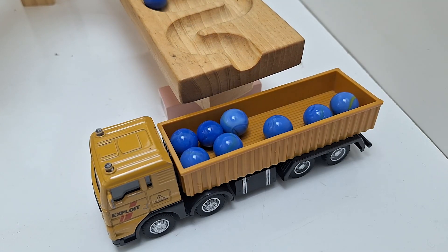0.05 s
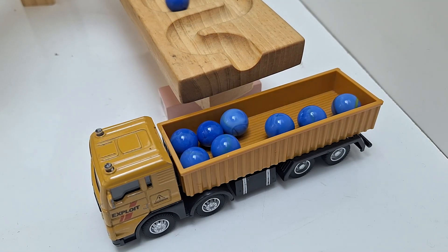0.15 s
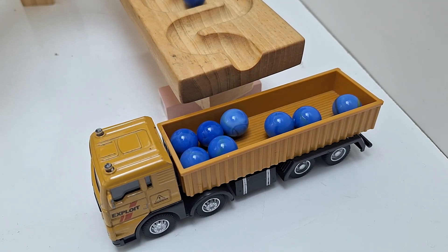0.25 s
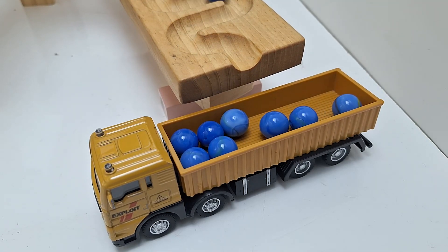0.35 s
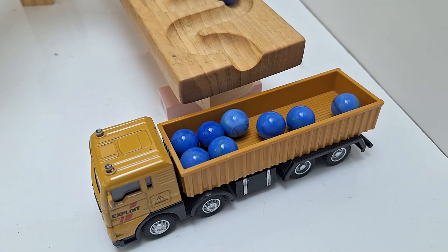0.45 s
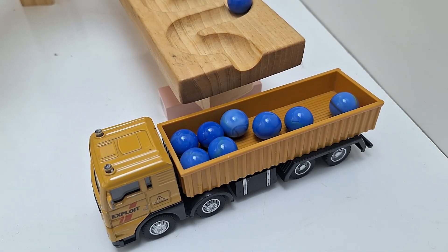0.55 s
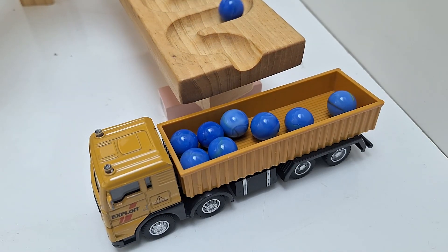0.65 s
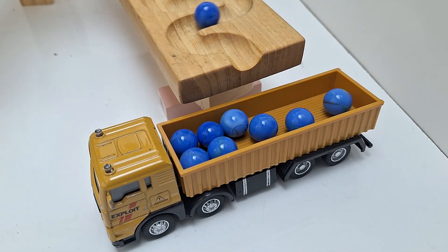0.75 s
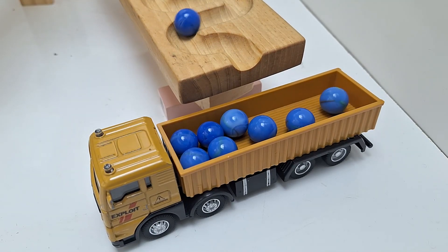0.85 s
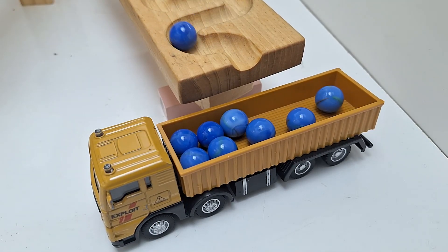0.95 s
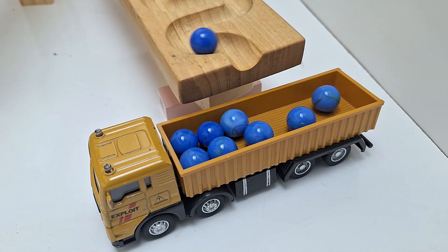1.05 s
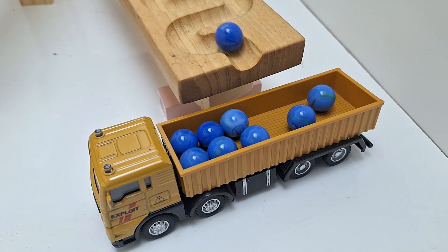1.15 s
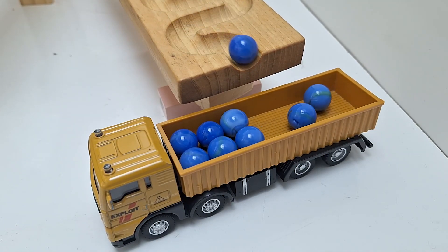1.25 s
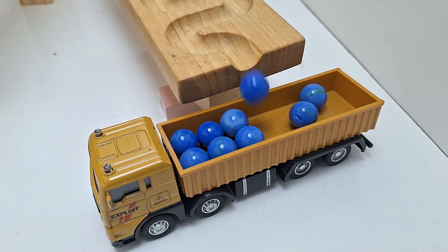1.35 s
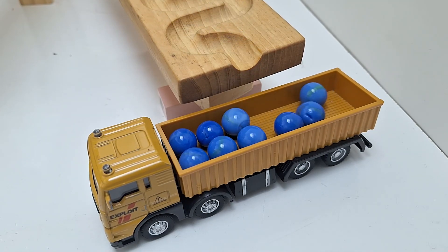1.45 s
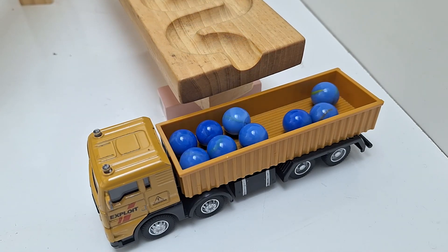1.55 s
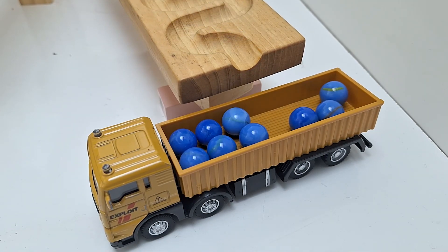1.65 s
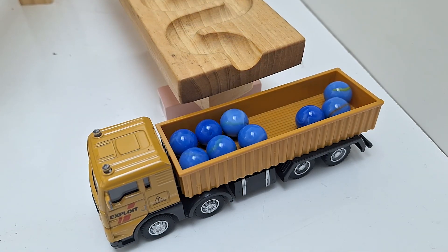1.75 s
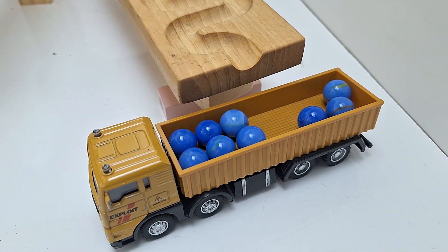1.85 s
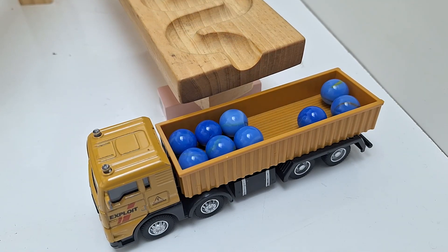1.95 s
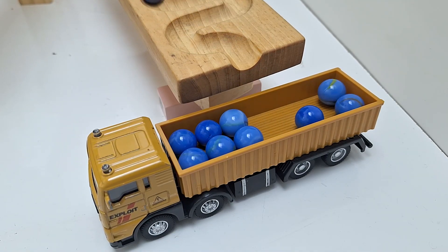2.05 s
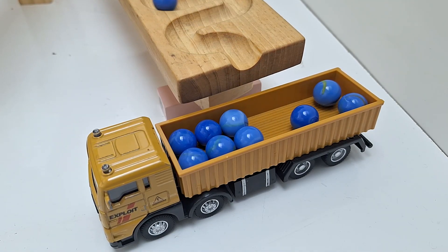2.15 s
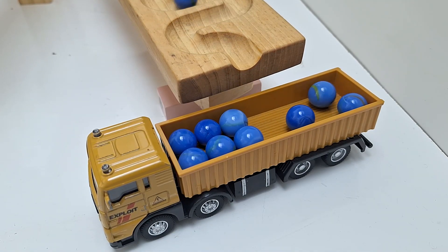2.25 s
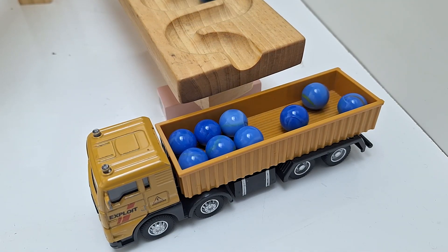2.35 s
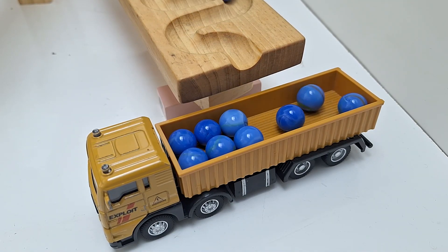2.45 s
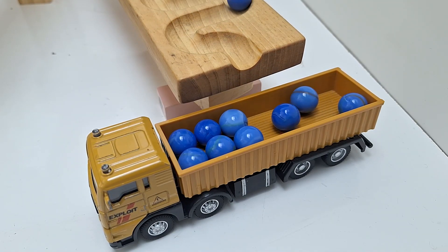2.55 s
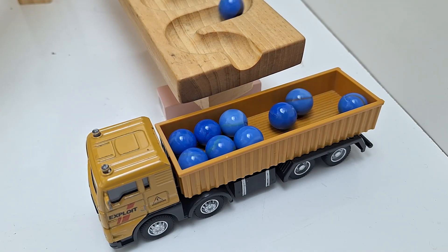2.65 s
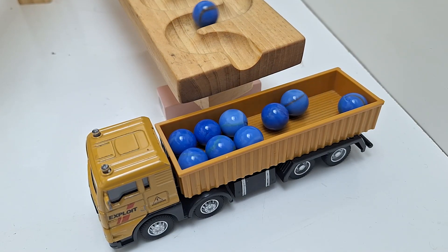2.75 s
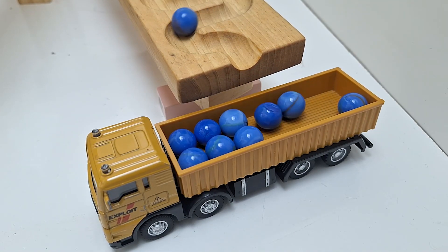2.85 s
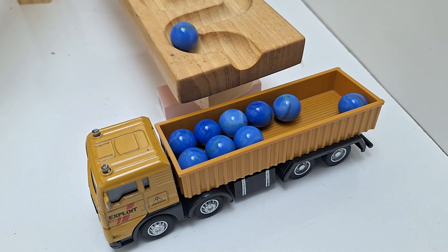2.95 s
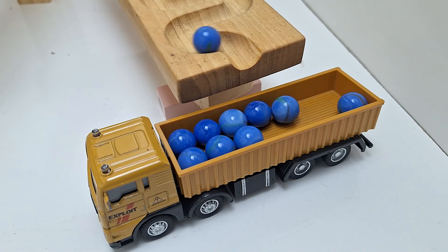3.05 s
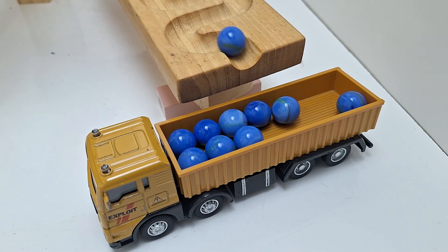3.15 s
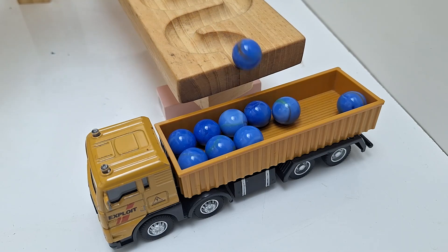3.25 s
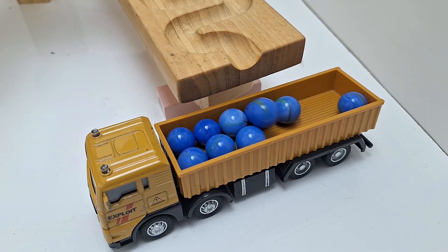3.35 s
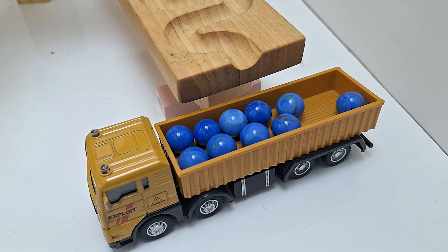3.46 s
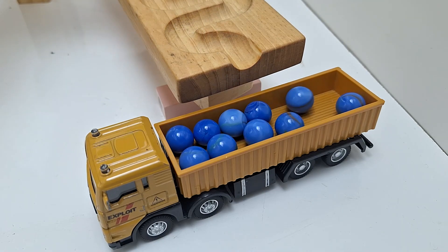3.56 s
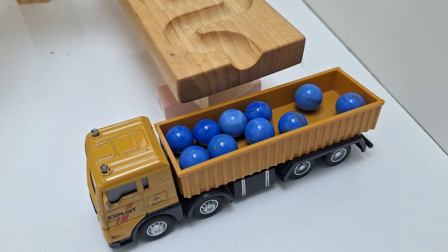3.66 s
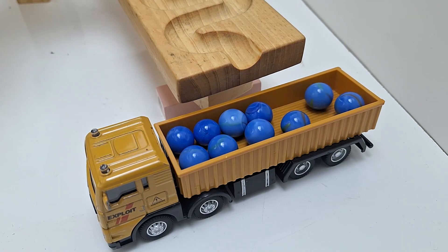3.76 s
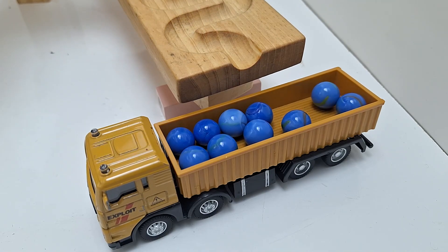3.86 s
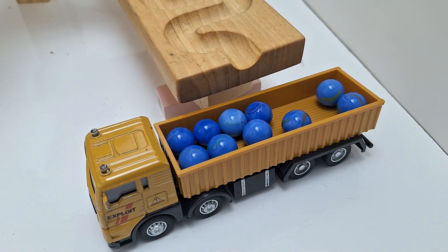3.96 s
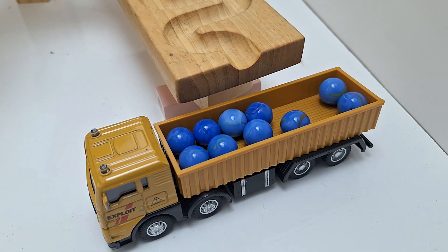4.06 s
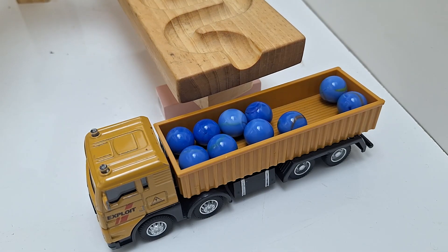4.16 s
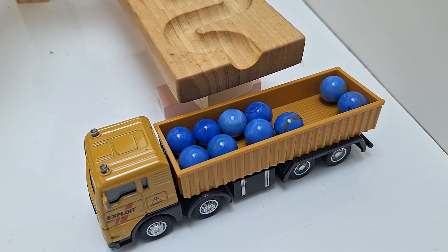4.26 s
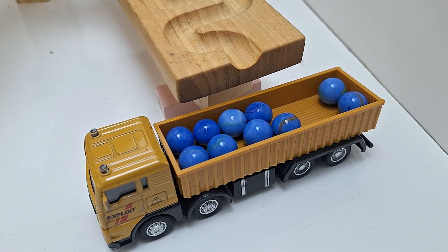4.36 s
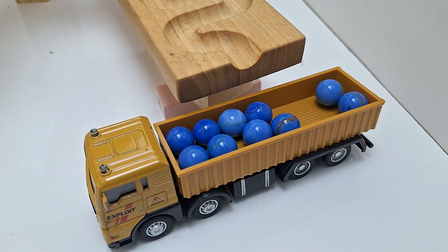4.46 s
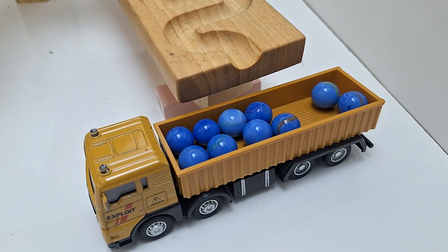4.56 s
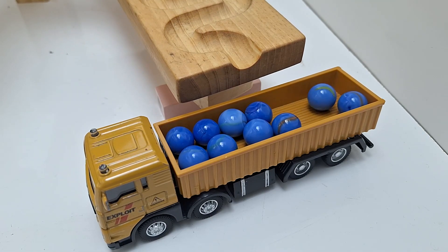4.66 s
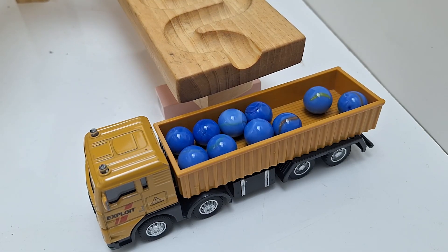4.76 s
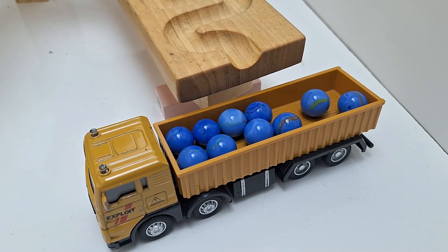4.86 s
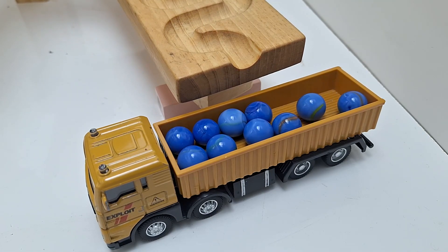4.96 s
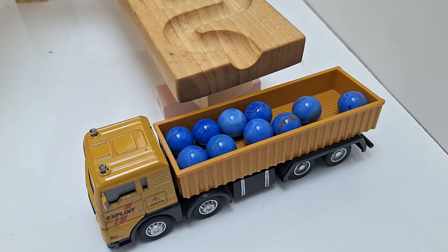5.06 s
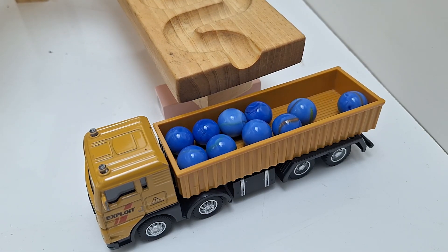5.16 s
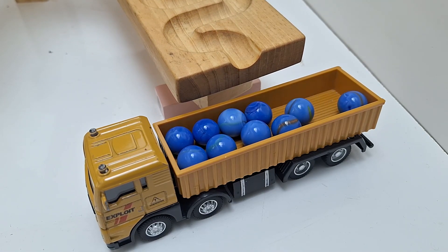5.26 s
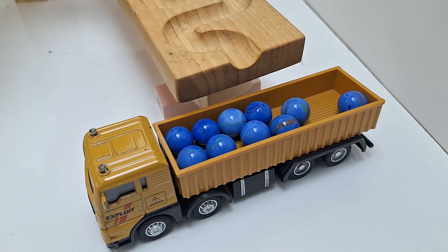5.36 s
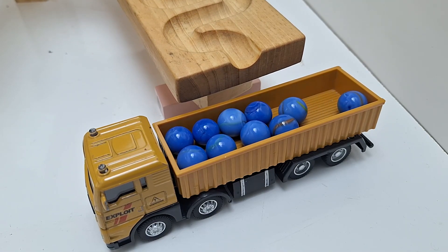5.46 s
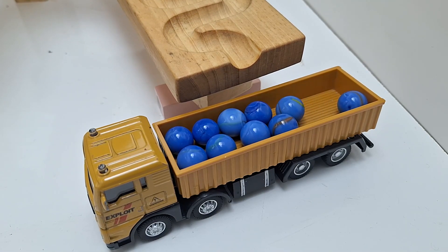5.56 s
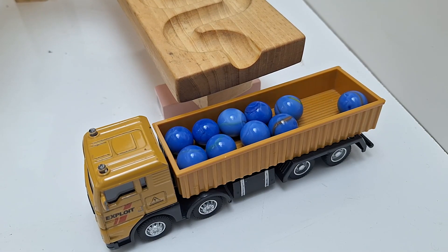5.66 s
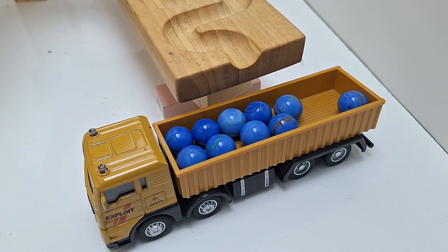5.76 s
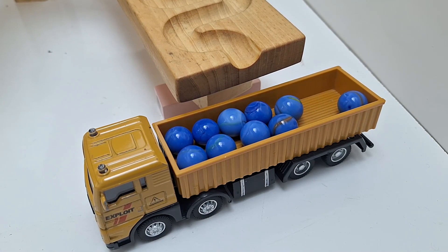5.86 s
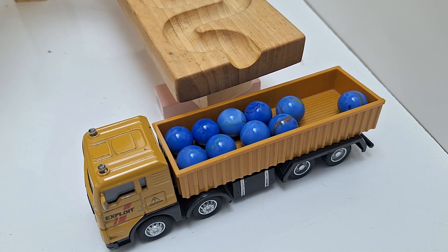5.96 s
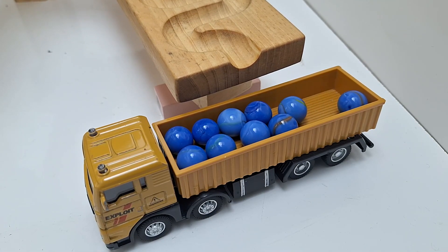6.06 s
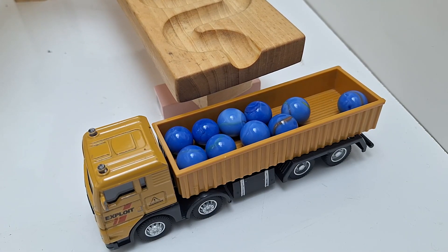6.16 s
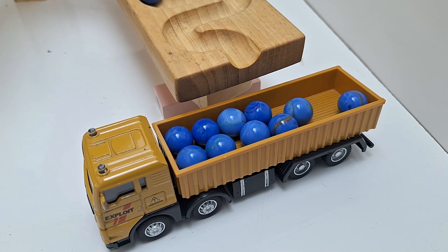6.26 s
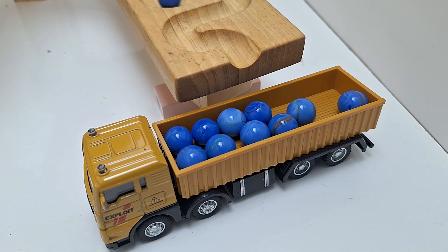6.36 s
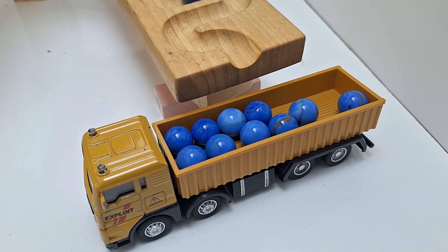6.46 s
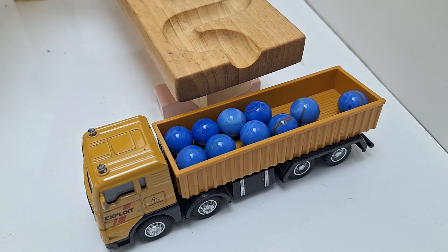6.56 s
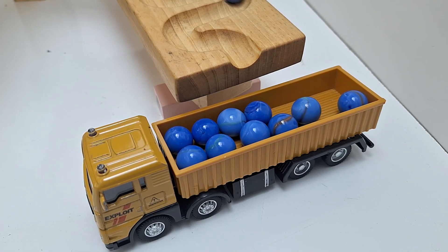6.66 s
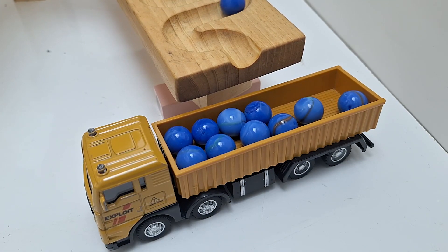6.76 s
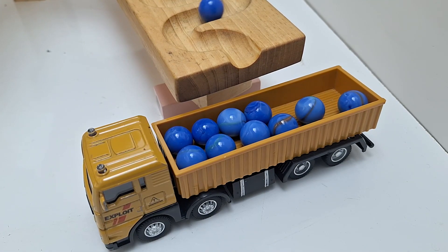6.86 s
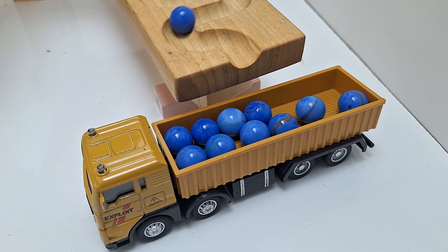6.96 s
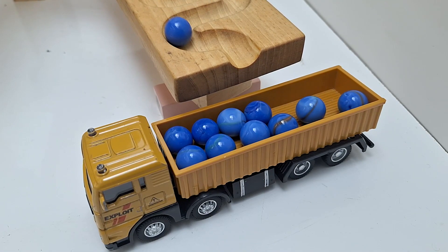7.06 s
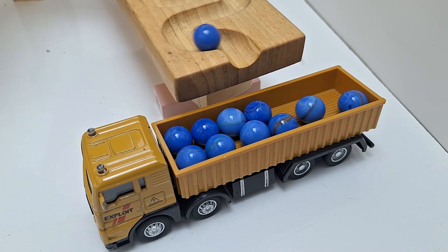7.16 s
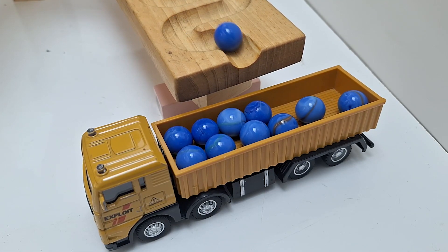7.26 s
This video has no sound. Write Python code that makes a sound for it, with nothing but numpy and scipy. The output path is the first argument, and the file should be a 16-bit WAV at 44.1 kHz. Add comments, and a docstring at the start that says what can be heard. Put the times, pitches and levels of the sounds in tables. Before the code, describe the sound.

A close stereo pickup in a small hard room, with low noise and a faint hum. From 0 to 1.4 s a marble rumbles unevenly down a wooden groove with soft hollow knocks, firmer near 1.3 s with a bright glass tick. At 1.43 s it drops into a thin plastic truck bed: a loud, fast flurry of clacks until 1.6 s, then lighter taps and drumming over ribs until about 2.4 s. Rolling on wood returns at 2.5 s, with knocks near 3.2 s, and a second plastic clatter at 3.4 to 3.55 s. At 3.94 s a hard wooden knock and several bounces lead into brief rolling, with glassy ticks around. It is nearly quiet from 4.5 to 5.2 s. Faint rolling grows, then loud wooden knocks cluster at 5.8 to 5.9 s. Steady rumbling and sparse knocks continue to the end at about 7.3 s.

```python
"""Marbles knock and rumble down a wooden run, then clatter into the plastic bed of a toy truck.
There they drum over its ribs and click together, in a small hard room with a faint low hum.
The wooden block rings as a few clear sine modes plus filtered noise for its many duller modes.
Plastic and glass ring as short bursts of filtered noise; rolling is a run of tiny random impacts."""
import sys
import numpy as np
from scipy import signal
from scipy.fft import rfft, irfft, next_fast_len
from scipy.io import wavfile

SR = 44100
rng = np.random.default_rng(int(sys.argv[2]) if len(sys.argv) > 2 else 0)


def bounce(signal):
    """Save signal as a 16-bit WAV file at the path given by the first command-line argument."""
    frames = np.transpose(np.atleast_2d(signal))
    limited = np.clip(frames, -1, 1)
    pcm = np.round(limited * 32767).astype(np.int16)
    wavfile.write(sys.argv[1], SR, pcm)


N = 322371  # length in samples

# All levels in these tables are relative: the functions below add their own mix settings.
# Room tone. Each row: frequency in Hz, level in dB per Hz.
ROOM_AIR = [(15, -16.5), (33, -4), (55, -1.5), (85, -0.5), (115, -5.5), (185, -5.5), (310, -24),
            (490, -20.5), (800, -47.5), (2000, -44), (3000, -42.5), (6000, -34), (8000, -44),
            (15000, -50.5)]
# Steady hum. Each row: frequency in Hz, level in dB.
HUM_TONES = [(37.7, -56.5), (75.4, -60)]
# How fast the room's tail dies. Each row: frequency in Hz, time to fall by 60 dB in seconds.
ROOM_DECAY = [(100, 0.69), (500, 0.37), (1500, 0.33), (3000, 0.33), (6000, 0.3), (10000, 0.29),
              (15000, 0.31)]
# How alike the noise is at the two microphones, for sound straight from its source and for the room.
# Each row: frequency in Hz, likeness from 0 to 1.
DIRECT_LIKENESS = [(100, 0), (400, 1), (1000, 0), (3000, 0), (15000, 0)]
ROOM_LIKENESS = [(100, 1), (300, 0.91), (600, 1), (1300, 0.16), (15000, 0.027)]
# Spells of high hiss. Each row: start in seconds, end in seconds, level at the start in dB.
HISS_SPELLS = [(0.31, 0.88, -73), (0.854, 1.45, -70), (3.03, 3.4, -68)]
HISS_RISE_S, HISS_SAG_DB_PER_S, HISS_RELEASE_S = 0.04, 11, 0.06

# Marble on marble. Each row: start in seconds, level of the click in dB, body in dB against the click.
MARBLE_CLICKS = [(0.28, -47, -28), (0.3053, -51.5, 7.5), (1.203, -47.5, 9), (1.299, -35, -10),
                 (2.6493, -45, -20), (2.716, -41, -19.5), (3.071, -44, -27), (3.8826, -49, -26.5),
                 (3.923, -40, -5.5), (4.36, -56, -12), (4.458, -64.5, -14), (4.74, -64.5, -6),
                 (5.1708, -44, -23.5), (5.45, -56, -14.5), (6.3115, -66, 6)]
# Dense modes of the marbles. Each row: frequency in Hz, level in dB per Hz.
GLASS_COLOUR = [(100, -36.5), (1000, -17), (2500, -19), (4000, -6), (5500, -0.5), (6300, 6), (7500, -10),
                (10000, -13.5), (15000, -27)]
# How fast they die. Each row: frequency in Hz, time to fall by 60 dB in seconds.
GLASS_DECAY = [(1000, 0.039), (6000, 0.037), (15000, 0.0095)]

# Marble on plastic. Each row: start in seconds, level of the clack in dB, snap in dB against the clack.
BED_CLACKS = [(1.4333, -12.5, -8), (1.44, -17.5, -9.5), (1.4705, -13.5, -8), (1.5051, -18, -11.5),
              (1.5301, -16, -7.5), (1.6046, -30, -39), (1.766, -30, -12.5), (1.8307, -33.5, -4),
              (1.9027, -31, -8.5), (2.0613, -24.5, 1), (2.1145, -28, -5), (2.2187, -33, -8),
              (2.2697, -29, -6.5), (3.035, -32.5, -10.5), (3.043, -30.5, -20.5), (3.4036, -11, -12.5),
              (3.4174, -15.5, -7), (3.4434, -19.5, -12.5), (3.467, -17.5, -11.5), (3.495, -16, -5),
              (3.5355, -16.5, -16), (3.5632, -35.5, 2.5)]
# Sound colours of the truck bed: struck, drummed on, its walls ringing, and the marbles' chatter.
# Each row: frequency in Hz, level in dB per Hz.
BED_COLOUR = [(40, -14.5), (150, -14.5), (300, -2.5), (450, -13), (560, -4.5), (780, -14.5), (1200, 2.5),
              (1500, 1.5), (2000, -2.5), (3100, 2), (4200, -4), (6200, 0.5), (7500, -4.5), (15000, -16)]
BED_DRUM_COLOUR = [(30, -5.5), (70, -1), (130, -8), (210, -1.5), (330, 3.5), (490, 6.5), (780, -2),
                   (1050, 3.5), (1250, 6.5), (1480, -10), (2600, -21), (6000, -44.5)]
BED_WALL_COLOUR = [(200, -22.5), (1200, -22), (1550, -15), (1750, 7), (1900, -4.5), (2100, 1), (2500, -30),
                   (5000, -51)]
BED_CHATTER_COLOUR = [(200, -34.5), (1500, 4), (2600, -7), (4500, 0.5), (6200, 5), (7500, -1.5), (9000, -6),
                      (11000, -19), (15000, -24.5)]
# How fast the plastic's ring dies. Each row: frequency in Hz, time to fall by 60 dB in seconds.
PLASTIC_DECAY = [(200, 0.048), (1200, .08), (3000, .055), (7000, 0.028), (15000, .035)]
# Shoves that set marbles rolling over the bed. Each row: start in seconds, level of the drumming in dB,
# ring of the walls in dB against the drumming, time to slow to rest in seconds.
BED_SHOVES = [(1.798, -28, -10.5, 0.18), (1.884, -29, -5.5, 0.18), (2.038, -29.5, -2, 0.37),
              (2.248, -31.5, -13.5, 0.19), (2.388, -40.5, -22.5, 0.16)]
SHOVE_RISE_S = 0.034

# Rolling down the groove, one list for each run; the rumble's level stands for the marble's speed.
# Each row: time in seconds, level in dB.
GROOVE_RUNS = [
    [(0.0, -44), (0.23, -54.5), (0.604, -46), (0.864, -54.5), (0.878, -45.5), (1.398, -38.5), (1.41, -40)],
    [(2.5, -49), (2.642, -49.5), (2.652, -41), (2.79, -51.5), (3.218, -43.5), (3.31, -45), (3.39, -62)],
    [(3.98, -41), (4.048, -39), (4.056, -32), (4.224, -47.5), (4.282, -60), (4.312, -56.5), (4.5, -74.5)],
    [(4.9, -79), (4.94, -79), (4.972, -68), (5.244, -61), (5.336, -49), (5.476, -48.5), (5.78, -55)],
    [(5.98, -44.5), (6.06, -48), (6.692, -48), (6.7, -43.5), (6.972, -48), (7.03, -41), (7.3, -47)],
]
# The marble swings out to the far left end of the block and back.
# Each row: turning time in seconds, time from the turn until the swing has shrunk to 37 % in seconds.
FAR_SWINGS = [(0.92, 0.32), (2.802, 0.32), (4.398, 0.54), (5.149, 0.13), (6.33, 0.071), (6.799, 0.11)]
# Sound colour of the groove's rumble. Each row: frequency in Hz, level in dB per Hz.
GROOVE_COLOUR = [(25, -25), (80, -6), (105, -14.5), (165, 7), (215, -11.5), (310, 5), (400, -4), (490, 7),
                 (570, -0.5), (750, -2), (900, -9), (1500, -17.5), (2400, -28.5), (3000, -37)]
# The block's ring while a marble rolls in the middle, and its change at the far end, in dB
RING_DB, FAR_RING_DB = -2.5, -17.5

# Knocks of marble on wood. Each row: start in seconds, level of the ring in dB,
# crack in dB against the ring, left over right in dB.
WOOD_KNOCKS = [(0.0024, -32.5, -34, 0), (0.2364, -39, -35, -2.5), (0.3419, -38, -41, 0),
               (0.4562, -36.5, -36, 1), (0.5452, -35.5, -11.5, -1), (0.6985, -37, -23.5, 1),
               (0.8752, -35.5, -13.5, 1), (1.0481, -36.5, -43, 2.5), (1.143, -39.5, -16, -1),
               (1.2356, -38, -35, -14), (1.2703, -29, -30, -2), (1.3009, -24, -18.5, -1),
               (1.739, -38.5, -41, 1), (2.56, -41, -21, -1.5), (2.646, -37.5, -25, 1),
               (3.1277, -36, -34, 1.5), (3.2041, -32, -27.5, 0), (3.26, -37.5, -23, -6),
               (3.9401, -10.5, -25, -2), (4.0284, -21, -29.5, -1), (4.0584, -18.5, -15, 0.5),
               (4.114, -20.5, -7.5, 0.5), (4.1276, -28, -10, 11), (5.0961, -57.5, -47, 6),
               (5.3166, -45.5, -23.5, 12), (5.466, -28, -42.5, -1.5), (5.61, -28.5, -30, -0.5),
               (5.7962, -12.5, -25, -2), (5.8151, -13, -7, -1), (5.888, -21, -17, 2),
               (5.914, -12.5, -16, -1), (6.0267, -31.5, -19.5, 0.5), (6.0622, -35, -31.5, 4.5),
               (6.467, -32, -32.5, -1.5), (6.703, -27.5, -7.5, 4.5), (7.022, -36, -17, 2),
               (7.2379, -26.5, -29, 1)]
# Clear modes of the wooden block. Each row: frequency in Hz, level struck in the middle in dB,
# level struck at the far left end in dB, time to fall by 60 dB in seconds.
BLOCK_MODES = [(168, -22, -22, 0.16), (492.6, -20.5, -18.5, 0.41), (828, -27, -25.5, 0.31),
               (1063, -20, -0.5, 0.067), (1227.5, -10.5, -17, 0.1), (1277.3, 2.5, -8.5, .06),
               (1967, -14, -10.5, 0.076), (2340, -9, 8.5, 0.051), (2747, -39, -25.5, .06),
               (2970, -35.5, -10.5, 0.21), (3020, -19.5, -33, 0.019), (3540, -9, -28.5, 0.062),
               (4400, -27.5, -37.5, 0.075)]
# Dense modes of block and posts, and the block's chatter on its plastic posts.
# Each row: frequency in Hz, level in dB per Hz.
WOOD_COLOUR = [(30, -29.5), (75, 10), (150, 7.5), (350, 6.5), (550, 2), (850, -3.5), (1300, -6.5),
               (2300, -10.5), (3600, -23.5), (5000, -23.5), (7000, -33), (10000, -50.5), (15000, -47.5)]
POST_COLOUR = [(300, -28), (1500, -9), (2400, -1), (3000, -3.5), (3500, -3.5), (4200, -16), (6000, -28.5),
               (15000, -53.5)]
# How fast the dense wood modes die. Each row: frequency in Hz, time to fall by 60 dB in seconds.
WOOD_DECAY = [(100, 0.21), (500, .09), (1500, 0.033), (5000, 0.0055), (15000, 0.0078)]

# The low thud grows more slowly than the ring: its dB for a 0 dB blow, and dB per dB of the blow
WOOD_THUD_DB, WOOD_THUD_GROWTH = -25, 0.78
BED_THUD_DB, BED_THUD_GROWTH = -30, 0.4


def gain_of(db):
    """Turns decibels into amplitude."""
    return 10 ** (np.asarray(db) / 20)


def evened(x):
    """Scales a stereo sound so that the average of its two sides has rms 1."""
    return x / np.sqrt(np.mean(x.mean(0) ** 2) + 1e-20)


def read(points, hz):
    """Reads a table between its rows, on a log-frequency axis."""
    f, value = np.transpose(points)
    return np.interp(np.log(hz + 1), np.log(f), value)


def add(mix, s, sound):
    """Adds a stereo sound to the mix at time s in seconds."""
    part = mix[:, max(round(s * SR), 0):][:, :sound.shape[1]]
    part += sound[:, :part.shape[1]]


def level(rows):
    """Turns a dB curve into a gain that fades in before its start and out after its end."""
    s, db = np.transpose(rows)
    times = np.r_[s[0] - .1, s, s[-1] + .4]
    return gain_of(np.interp(np.arange(N) / SR, times, np.r_[-120, db, -120]))


def colour(x, points):
    """Filters a sound to a (Hz, dB) curve, with the least delay that curve allows (minimum phase)."""
    size = 2 * next_fast_len(x.shape[1] // 2 + 1024)
    cepstrum = irfft(np.log(gain_of(read(points, np.fft.rfftfreq(size, 1 / SR)))))
    # folding the cepstrum forward in time makes the filter causal
    cepstrum[1:size // 2] *= 2
    cepstrum[size // 2 + 1:] = 0
    return irfft(rfft(x, size) * np.exp(rfft(cepstrum)), size)[:, :x.shape[1]]


def noise_pair(count, same, t60=None):
    """Noise at two microphones, as alike as the table says; with t60, each band dies at its own speed."""
    hz, t, z = signal.stft(rng.standard_normal((2, count)), SR, nperseg=256)
    likeness = np.clip(read(same, hz), -1, 1)[:, None]
    z[1] = likeness * z[0] + np.sqrt(1 - likeness ** 2) * z[1]
    if t60 is not None:
        z = z * gain_of(-60 * t / read(t60, hz)[:, None])
    return signal.istft(z, SR)[1][:, :count]


def panned(x, db):
    """Sets left over right by db."""
    return x * gain_of([[db / 2], [-db / 2]])


def in_room(x, wet_db, gap=0.0037):
    """Adds a room tail of fading noise, drawn anew each time; it swells in around gap seconds."""
    tail = noise_pair(SR // 2, ROOM_LIKENESS, ROOM_DECAY)
    tail *= np.clip(np.arange(SR // 2) / SR / gap - .5, 0, 1)
    tail *= gain_of(wet_db) / np.linalg.norm(tail[0])
    tail[:, 0] = 1  # the direct sound
    return signal.fftconvolve(x, tail, axes=1)


def dense_ring(body, t60, lag_count=6):
    """Countless overlapping modes struck at once, as dying noise; the right side lags by a few samples."""
    left, right = colour(noise_pair(SR // 4, DIRECT_LIKENESS, t60), body)
    return evened(np.array([left, np.pad(right, (lag_count, 0))[:len(left)]]))


def block_ring(far, spread_db=0, lag=0.00015, rise=0.0013):
    """The block's modes as struck at one spot (far 0-1); they reach the left microphone first."""
    t = np.maximum(np.arange(SR // 4) / SR - np.array([[0], [lag]]), 0)
    hz, middle_db, end_db, t60 = np.transpose(BLOCK_MODES)[:, :, None, None]
    db = middle_db + far * (end_db - middle_db) + spread_db * rng.standard_normal(hz.shape)
    # modes start in pairs, two upward and two downward
    sign = (-1) ** (np.arange(len(hz)) // 2)[:, None, None]
    modes = sign * gain_of(db - 60 * t / t60) * np.sin(2 * np.pi * hz * t)
    return evened(modes.sum(0) * (1 - np.exp(-t / rise)))


def contact(ring, db, soft_hz=2300, hard_hz=14000, skid=0.11, skid_s=0.013):
    """A gentle bump has a long, dull contact and skids on for a moment; a hard blow is short and bright."""
    hard = np.clip((db + 31) / 17, 0, 1)
    t = np.arange(SR // 20) / SR
    grains = rng.standard_normal(len(t)) * (rng.random(len(t)) < .05)
    force = (1 - hard) * skid * np.exp(-t / skid_s) * grains
    force[0] = 1  # the blow itself
    corner_hz = min(soft_hz * (hard_hz / soft_hz) ** hard, SR / 3)
    dulled = signal.sosfilt(signal.butter(5, corner_hz, fs=SR, output="sos"), ring)
    return signal.fftconvolve(dulled, force[None], axes=1)


def blow(ring, bands, dbs):
    """Lifts or lowers each band of a blow so that its first 10 ms comes out at the given level."""
    head = ring.mean(0)[:SR // 100]
    power = 2 * abs(rfft(head, 4096)) ** 2 / (4096 * len(head))
    hz = np.fft.rfftfreq(4096, 1 / SR)
    have = [10 * np.log10(power[(hz > lo) & (hz < hi)].sum()) for lo, hi in bands]
    # lift or lower each band at its middle by what it lacks
    return colour(ring, [(np.sqrt(lo * hi), db - h) for (lo, hi), db, h in zip(bands, dbs, have)])


def rolling(rings, per_s, spread_db, wet_db):
    """A rolling marble is a run of tiny random impacts; each falls on one of a few spots with its own ring."""
    size = gain_of(spread_db * np.minimum(rng.exponential(1, N), 2.5)) * rng.choice([-1, 1], N)
    force = size * (rng.random(N) < per_s / SR)
    spot = rng.integers(0, len(rings), N)
    out = np.zeros((2, N))
    for k, ring in enumerate(rings):
        ring_in_room = in_room(ring, wet_db)[:, :SR // 2]
        out += signal.oaconvolve((force * (spot == k))[None], ring_in_room, axes=1)[:, :N]
    return evened(out)


def room_tone(air_db=-62, hum_db=-2):
    """Low noise and steady sine hum of the room, a little stronger on the left."""
    t = np.arange(N) / SR
    hum = sum(gain_of(db) * np.sqrt(2) * np.sin(2 * np.pi * (hz * t + rng.random())) for hz, db in HUM_TONES)
    air = evened(colour(noise_pair(N, ROOM_LIKENESS), ROOM_AIR))
    return panned(gain_of(air_db) * air, db=0.5) + panned(gain_of(hum_db) * hum, db=4)


def hiss():
    """A faint high hiss, made of filtered noise, sets in, sags slowly and dies away."""
    hiss_colour = [(1000, -16), (3500, 2), (6300, 2), (12000, -5), (15000, -7)]
    noise = evened(colour(noise_pair(N, ROOM_LIKENESS), hiss_colour))
    t, loudness = np.arange(N) / SR, np.zeros(N)
    for start, end, db in HISS_SPELLS:
        age, over = np.maximum(t - start, 0), np.maximum(t - end, 0)
        sagging = gain_of(db - HISS_SAG_DB_PER_S * age)
        loudness += np.minimum(age / HISS_RISE_S, 1) * sagging * np.exp(-over / HISS_RELEASE_S)
    return noise * loudness


def clicks(click_db=-7, body_db=-1, sparkle_db=-23, wet_db=-4):
    """Glass meets glass: a very short, bright tick."""
    out = np.zeros((2, N))
    bands = [(1500, 3500), (4000, 8000), (9000, 15000)]  # body, click, sparkle in Hz
    for s, db, body in MARBLE_CLICKS:
        band_dbs = [db + body + body_db, db + click_db, db + sparkle_db]
        click = blow(dense_ring(GLASS_COLOUR, GLASS_DECAY), bands, band_dbs)
        add(out, s, in_room(click, wet_db))
    return out


def coasting(start, rest_s):
    """A shoved marble gets up to speed and slows evenly to rest; its noise then follows its speed squared."""
    t = np.arange(N) / SR - start
    return np.clip(t / SHOVE_RISE_S, 0, 1) * np.clip(1 - (t - SHOVE_RISE_S) / rest_s, 0, 1) ** 2


def bed_roll(rumble_db=0.0, walls_db=-2, rattle_db=-7):
    """Marbles drum over the ribs of the truck bed, set its walls ringing and chatter against each other."""
    on_floor = np.max([gain_of(db) * coasting(s, rest_s) for s, db, _, rest_s in BED_SHOVES], axis=0)
    at_walls = np.max([gain_of(db + walls) * coasting(s, rest_s) for s, db, walls, rest_s in BED_SHOVES], axis=0)
    layers = [(BED_DRUM_COLOUR, rumble_db, on_floor),
              (BED_WALL_COLOUR, walls_db, at_walls),
              (BED_CHATTER_COLOUR, rattle_db, on_floor)]
    out = np.zeros((2, N))
    for body, db, drive in layers:
        rings = [dense_ring(body, PLASTIC_DECAY) for _ in range(3)]
        out += rolling(rings, per_s=120, spread_db=3.5, wet_db=-0.5) * gain_of(db) * drive
    return out


def clacks(clack_db=-7, snap_db=-1, wet_db=-3, pan_db=-1.5):
    """Marbles drop into the thin plastic bed, bounce and hit its walls: short rings of dense modes."""
    out = np.zeros((2, N))
    bands = [(150, 800), (1000, 4000), (5000, 15000)]  # thud, clack, snap in Hz
    for s, db, snap in BED_CLACKS:
        band_dbs = [BED_THUD_DB + BED_THUD_GROWTH * db, db + clack_db, db + snap + snap_db]
        clack = blow(dense_ring(BED_COLOUR, PLASTIC_DECAY), bands, band_dbs)
        add(out, s, in_room(clack, wet_db))
    return panned(out, pan_db)


def bumps(ring_db=-7):
    """About 26 times a second the marble jolts over a ridge of the grain: a small dull knock."""
    dull_contact = [(100, -6), (500, 1.5), (1300, 1), (1700, -6.5), (2350, -8), (3000, -25), (5000, -35)]
    jolts = [colour(dense_ring(WOOD_COLOUR, WOOD_DECAY) + gain_of(ring_db) * block_ring(far), dull_contact)
             for far in np.linspace(0, 1, 4)]
    return rolling(jolts, per_s=26, spread_db=2.0, wet_db=-4)


def groove_ring(far):
    """The block's clear modes under a rolling marble; the soft contact wakes mainly the lower ones."""
    soft_contact = [(200, -2.5), (1300, 7.5), (1800, 0.5), (2350, -7.5), (2900, -21), (4000, -33.5)]
    rings = [colour(block_ring(far), soft_contact) for _ in range(3)]
    return rolling(rings, per_s=100, spread_db=7.5, wet_db=-8)


def groove_roll(rumble_db=-1.5, bumps_db=-5, lumpy_db=2.47, lump_hz=9):
    """The grain of the wood shakes the rolling marble: a rumble, the block's ring and small bumps."""
    middle, end = groove_ring(0), groove_ring(1)
    t = np.arange(N) / SR
    far = np.clip(sum(np.exp(-((t - s) / width_s) ** 2) for s, width_s in FAR_SWINGS), 0, 1)
    ring = (np.sqrt(1 - far) * middle + np.sqrt(far) * end) * gain_of(RING_DB + FAR_RING_DB * far)
    thuds = [dense_ring(GROOVE_COLOUR, WOOD_DECAY) for _ in range(7)]
    rumble = rolling(thuds, per_s=330, spread_db=1.5, wet_db=-2.0)
    # rough and smooth patches of the groove make the rumble swell and dip
    patches = signal.sosfilt(signal.butter(2, lump_hz, fs=SR, output="sos"), rng.standard_normal(N))
    rumble = rumble * gain_of(rumble_db + lumpy_db * patches / patches.std())
    together = panned(rumble, db=0.5) + ring + gain_of(bumps_db) * bumps()
    return together * sum(level(run) for run in GROOVE_RUNS)


def knocks(ring_db=-6.5, crack_db=-1, body_db=1.5, chatter_db=-10, wet_db=-7, hard_crack_db=6):
    """Marbles land on the block and bump the bends of its groove; it rings and chatters on its posts."""
    out = np.zeros((2, N))
    bands = [(150, 700), (1000, 1500), (2000, 4500)]  # thud, ring, crack in Hz
    for s, db, crack, pan in WOOD_KNOCKS:
        # a knock heard from the left comes from the far end, which favours other modes
        far = np.clip((pan + 2) / 5, 0, 1)
        clear = block_ring(far, spread_db=3.5)
        body = gain_of(body_db) * dense_ring(WOOD_COLOUR, WOOD_DECAY)
        chatter = gain_of(chatter_db) * dense_ring(POST_COLOUR, PLASTIC_DECAY)
        # a strong crack also counts as a hard blow
        struck = contact(clear + body + chatter, max(db, db + crack + hard_crack_db))
        band_dbs = [WOOD_THUD_DB + WOOD_THUD_GROWTH * db, db + ring_db, db + crack + crack_db]
        knock = blow(struck, bands, band_dbs)
        add(out, s, in_room(panned(knock, pan), wet_db))
    return out


def scene():
    """Room, truck and marble run together."""
    return room_tone() + hiss() + clicks() + bed_roll() + clacks() + groove_roll() + knocks()


def record(dry):
    """The microphone's bass cut, the full-scale limit, then a cut of the highest treble."""
    heard = signal.sosfilt(signal.butter(4, 31, "highpass", fs=SR, output="sos"), dry)
    lowpass = signal.firwin(301, 15200, window=("kaiser", 8), fs=SR)  # cutoff in Hz
    return signal.oaconvolve(np.clip(heard, -1, 1), lowpass[None], "same", axes=1)


dry = scene()
out = record(dry)
bounce(out)
```